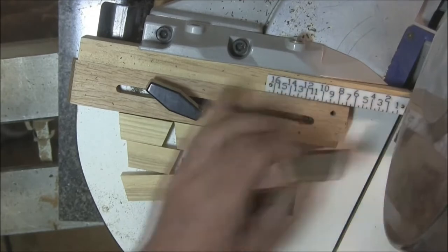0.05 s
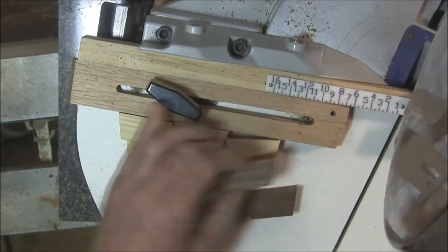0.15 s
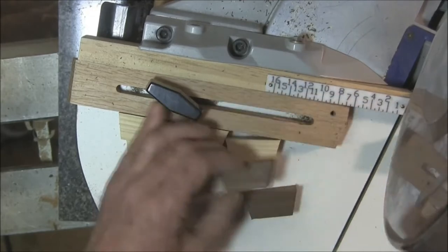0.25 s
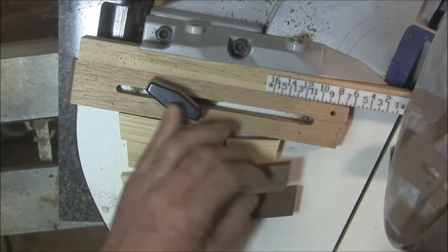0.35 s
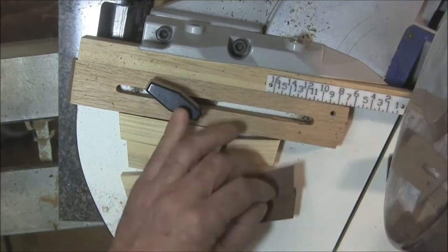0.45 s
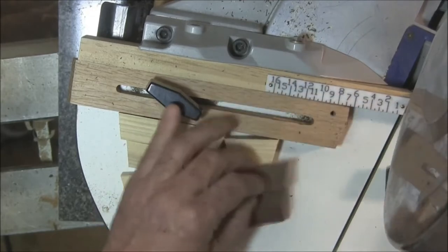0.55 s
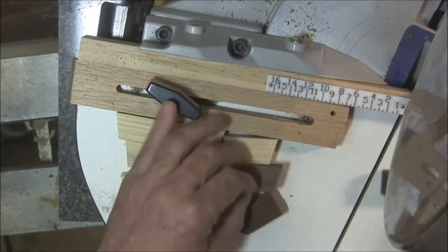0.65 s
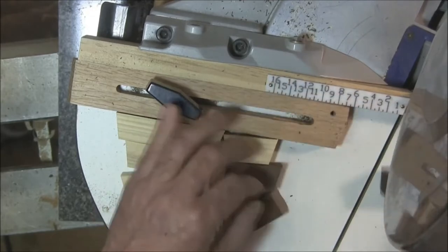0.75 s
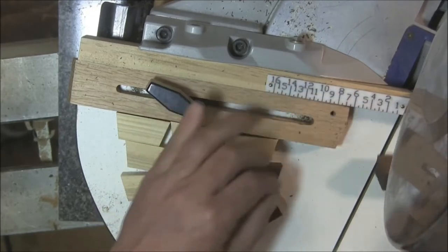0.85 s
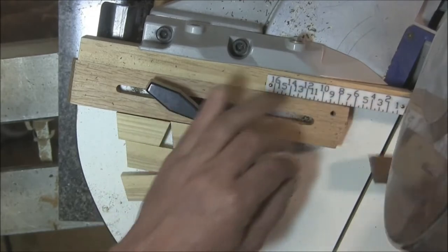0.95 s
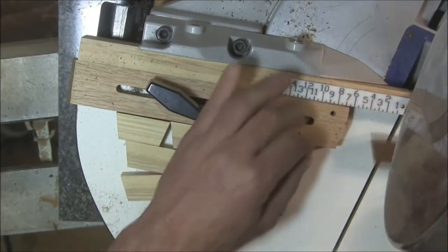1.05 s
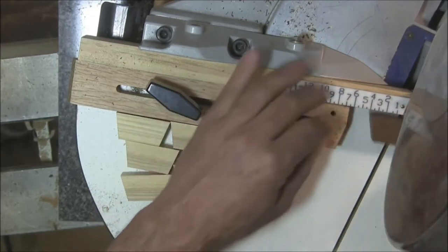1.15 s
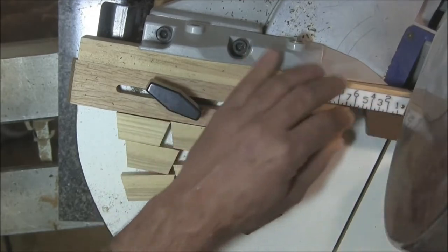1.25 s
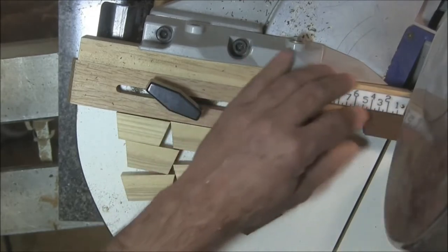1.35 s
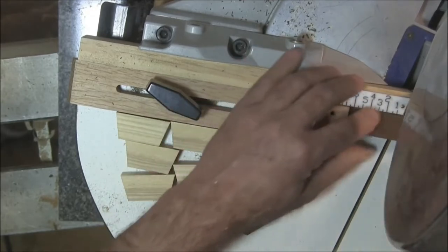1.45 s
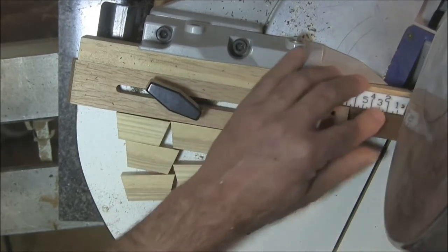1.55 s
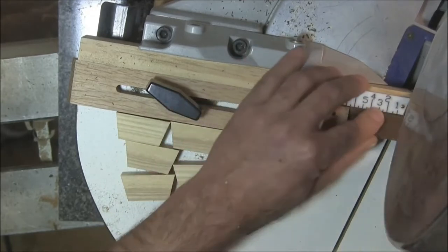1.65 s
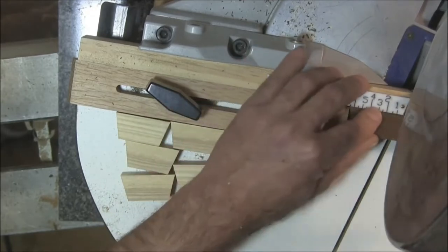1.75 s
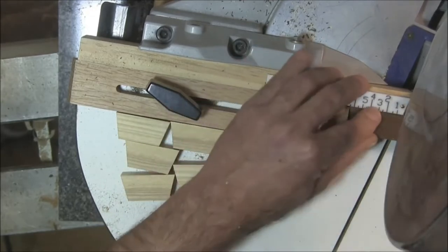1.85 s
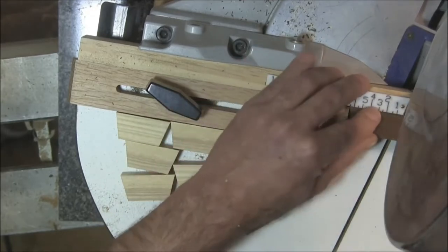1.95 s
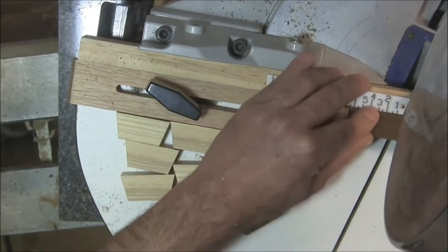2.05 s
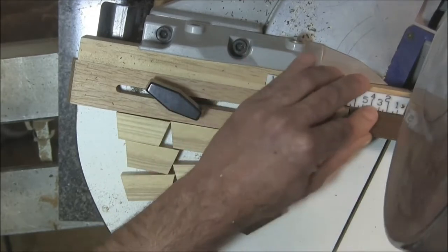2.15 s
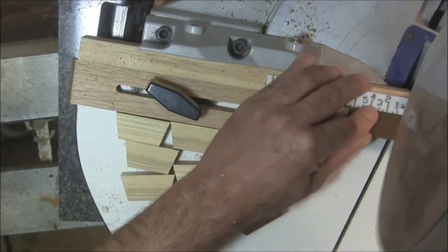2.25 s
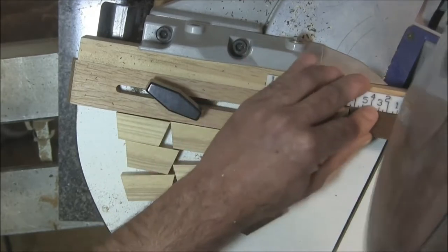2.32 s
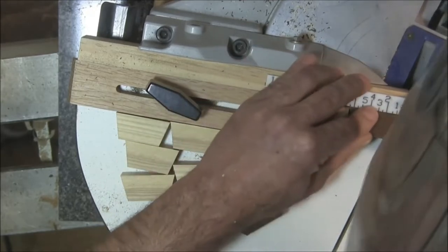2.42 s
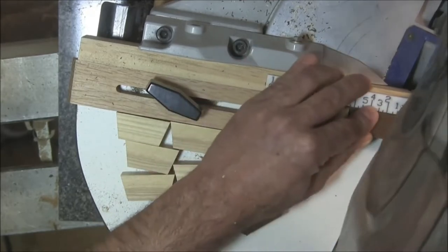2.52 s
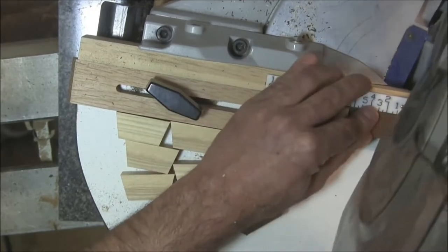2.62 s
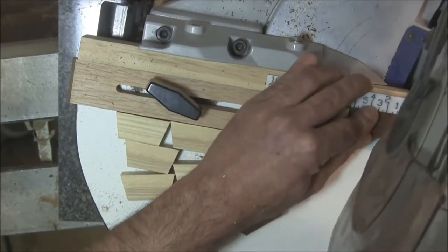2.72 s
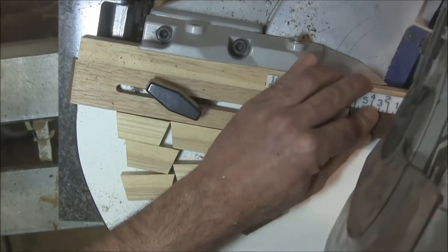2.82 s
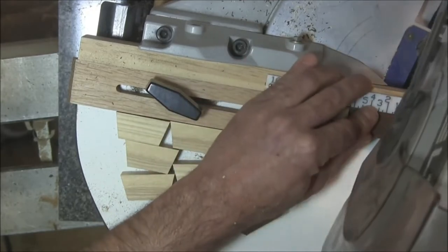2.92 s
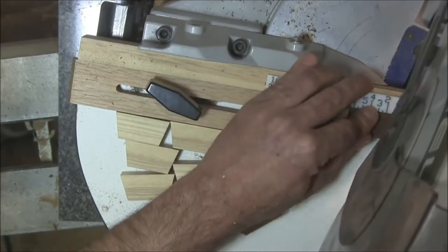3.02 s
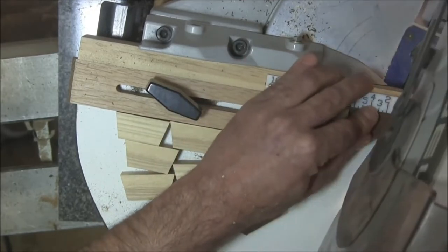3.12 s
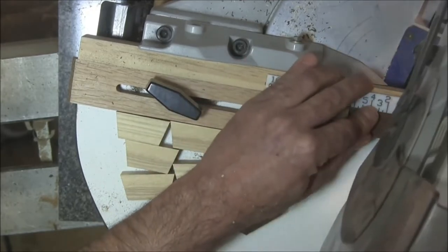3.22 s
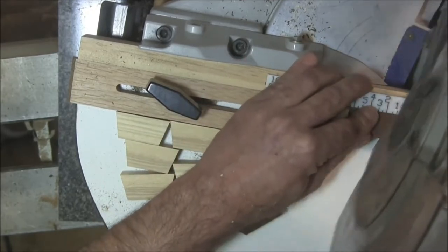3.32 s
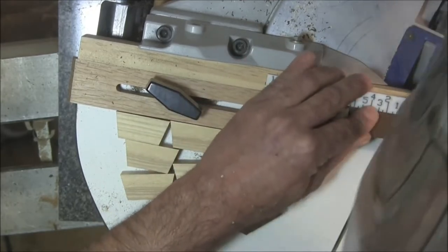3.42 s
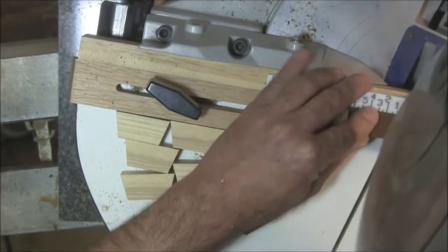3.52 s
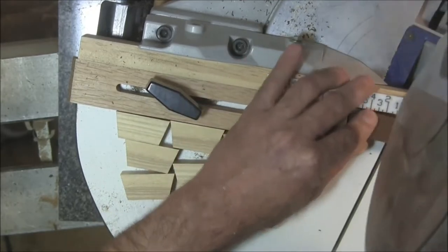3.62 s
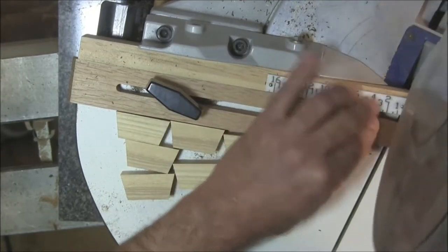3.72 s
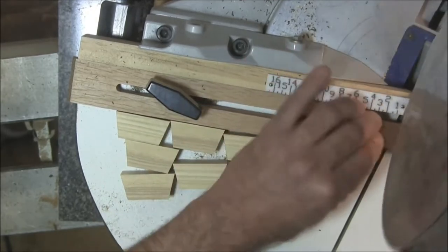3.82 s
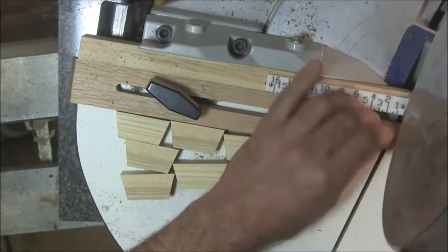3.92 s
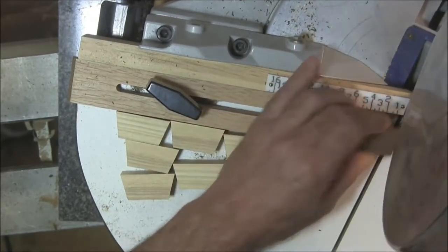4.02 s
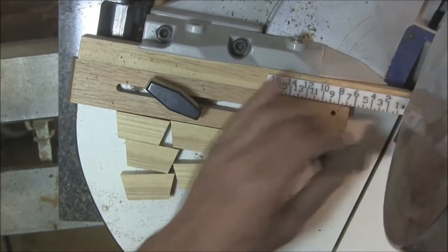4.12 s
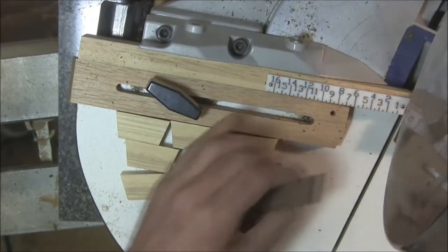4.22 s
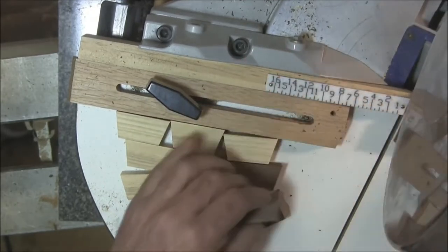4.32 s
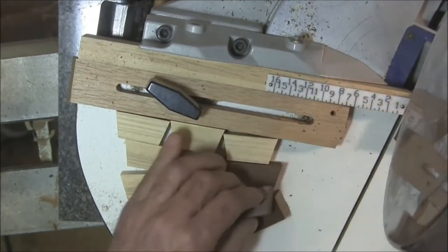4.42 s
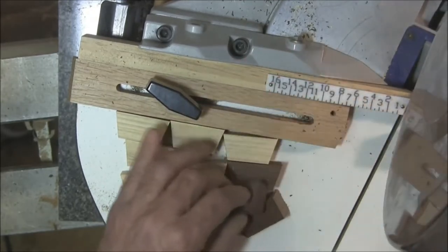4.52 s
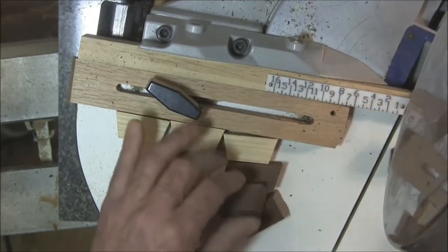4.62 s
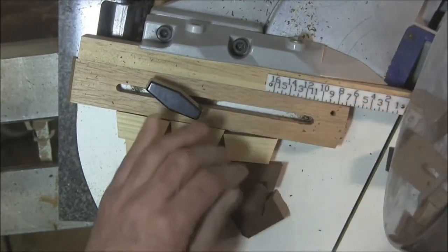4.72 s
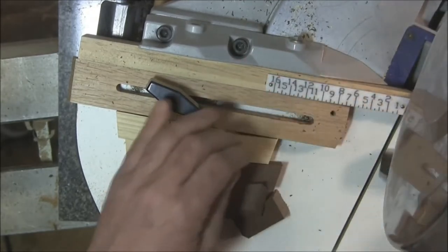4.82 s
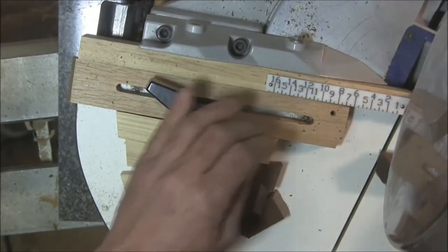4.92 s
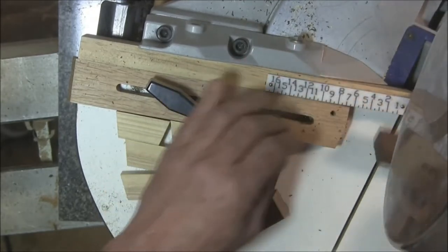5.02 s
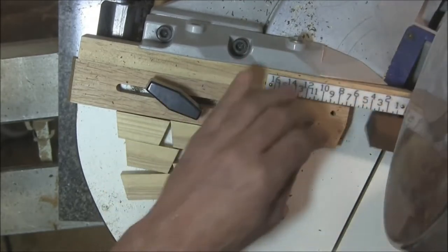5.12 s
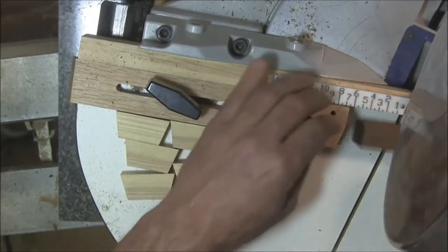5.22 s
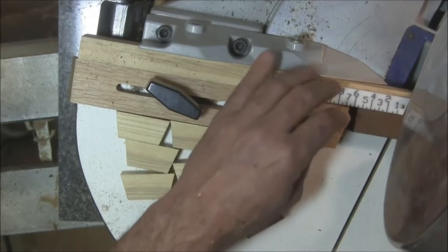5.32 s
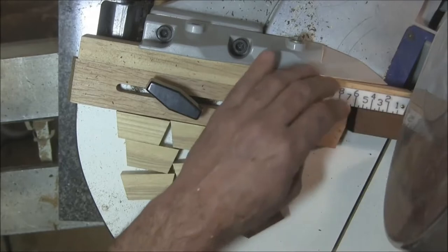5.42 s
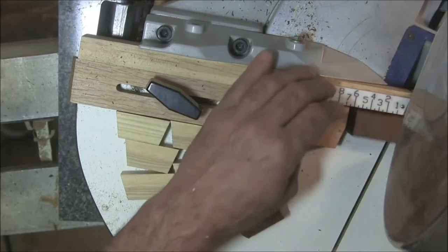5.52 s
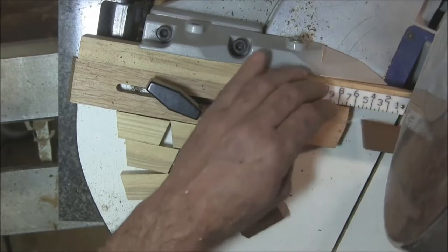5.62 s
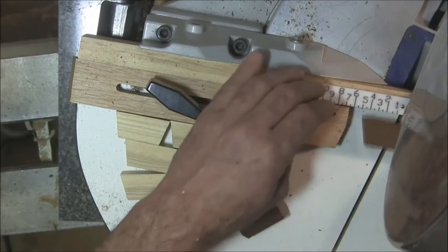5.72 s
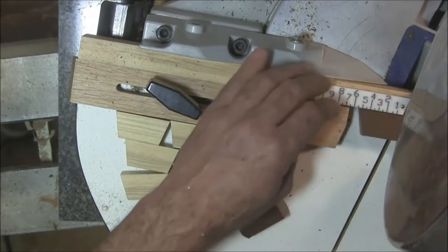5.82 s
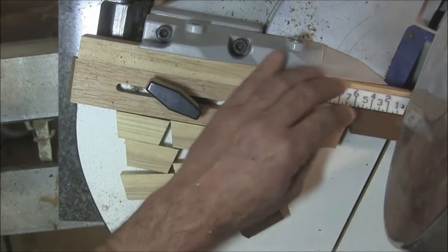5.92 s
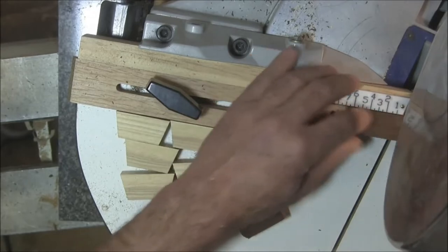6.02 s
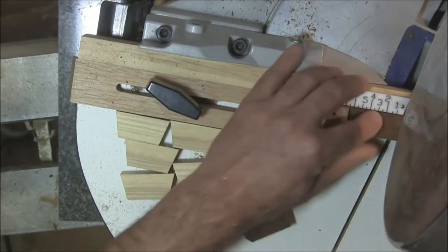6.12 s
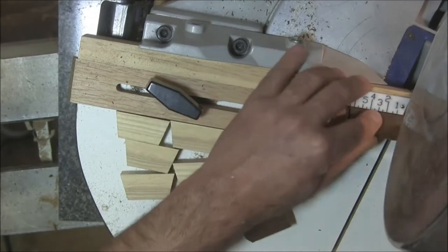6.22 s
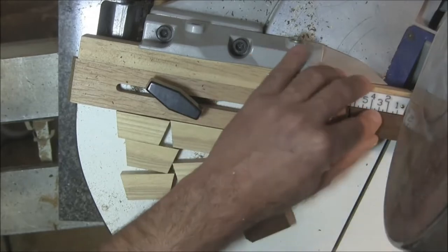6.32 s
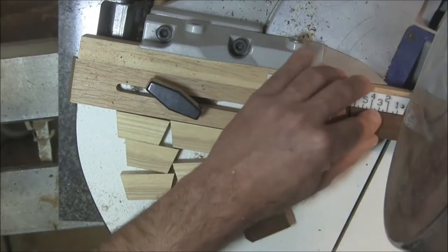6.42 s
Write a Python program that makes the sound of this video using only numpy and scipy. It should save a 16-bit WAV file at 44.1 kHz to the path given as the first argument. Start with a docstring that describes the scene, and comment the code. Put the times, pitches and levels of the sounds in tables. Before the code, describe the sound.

Close up, a chop saw whines up, rips through a wood strip and spins down, with small wood pieces tapping before and after.

```python
"""A chop saw in a small workshop

Close up, the saw coasts to a stop, is switched on, cuts a strip of wood and coasts down again.
The spinning core of its motor, the rotor, sets the pitch of the gear whine and the brush whine and
squeaks on every turn. The teeth tear the wood and make the blade ring. Meanwhile small wooden pieces
are put down and set against the fence (the guide rail), over a faint electrical buzz."""
import sys
import numpy as np
from scipy import signal
from scipy.fft import rfft, irfft, next_fast_len
from scipy.io import wavfile
from scipy.ndimage import uniform_filter1d

SR = 44100
rng = np.random.default_rng(int(sys.argv[2]) if len(sys.argv) > 2 else 0)


def master(y):
    """Save y as 16-bit WAV."""
    cut = np.clip(np.atleast_2d(y).T, -1, 1)
    pcm = np.round(cut * 32767)  # scale
    wavfile.write(sys.argv[1], SR, pcm.astype(np.int16))


N = 284870
TIME = np.arange(N) / SR

# rotor speed while the trigger is held: t/s, speed/(turns per s)
RUN_UP = [(2.48, 0), (2.53, 42), (2.6, 92), (2.7, 143), (2.8, 179), (2.87, 192), (3.15, 226), (3.45, 263),
          (3.57, 268)]
# the trigger is let go: t/s, time that friction and air drag alone need to end the spin/s
COASTS = [(-0.722, 2.787), (3.57, 2.8)]
# tones of the gears, whose small wheel has 9 teeth: cycles per turn, relative level/dB
GEAR_TONES = [(6, -3), (8, 0), (9, 10), (15, 2), (18, 12), (21, 6), (24, 2), (27, 5), (36, 5), (45, 4),
              (54, 2), (63, 7), (72, 2), (81, 6), (90, 3), (99, 3)]
# ringing of the gear case as those tones sweep through it: f/Hz, width/Hz, boost/dB
GEAR_CASE_MODES = [(742, 220, 9.5), (1110, 130, 1), (4500, 810, 3), (6960, 590, 3.5)]
# tones of the brushes sliding over the rotor's 28 contact bars: cycles per turn, relative level/dB
BRUSH_TONES = [(14, 21), (28, 16), (42, 4), (56, 17), (84, 19), (112, 17), (140, 16), (168, 15), (196, 12),
               (224, 10)]
# tone colour of the ringing motor shell, through which the brushes sound: f/Hz, level/dB
MOTOR_SHELL = [(400, -23.5), (1200, -13), (1700, -3), (2050, 2), (2600, -6), (3200, 3.5), (3900, -2.5),
               (5000, -9), (7000, -18.5), (11000, -8.5)]
# ringing of the blade guard and the table: f/Hz, width/Hz, boost/dB
BODY_MODES = [(462.3, 13, 13), (530, 130, 4.5), (785, 37, 1), (884, 23, 4), (1615, 60, 3), (2160, 99, -0.5),
              (3190, 98, 3), (4930, 110, 4), (6030, 120, 5.5), (6620, 230, 5), (8570, 230, 2.5),
              (10640, 230, 3)]
# tone colour of the saw's body when it coasts slowly: f/Hz, level/dB
BODY_COASTING = [(180, -58.5), (300, 3.5), (407, -12.5), (527, 2.5), (619, -7.5), (762, 1), (895, -7),
                 (1030, -3), (1450, -10.5), (3140, -3.5), (4060, -7), (4840, -0.5), (5250, -5),
                 (8900, -15.5), (9600, -21), (13300, -23), (14000, -42)]
# tone colour of the saw's body under power or at high speed: f/Hz, level/dB
BODY_POWERED = [(180, -33), (300, -9), (467, -4.5), (616, -2), (726, 1.5), (1880, -5.5), (2000, -2),
                (2870, -1), (4770, -2.5), (7300, -7.5), (8320, -19), (11400, -15), (15000, -40)]
# growl, whine, hiss and air of the running saw: low f/Hz, high f/Hz
RUNNING_BANDS = [(330, 1200), (1200, 3800), (3800, 7500), (7500, 15000)]
# loudness of those four bands: level at mid speed/dB, rise/(dB per doubling of speed),
# flattening/(dB per doubling squared), boost at full starting strain/dB
RUNNING_LEVELS = [(-44.5, 5, 0.11, 21.5), (-43, 5, 0.39, 9), (-41.5, 5.5, 1.16, 7.5), (-49, 6, 1, 0)]
# the blade goes through the strip, then grazes the loose end:
# t/s, length/s, entry level/dB, exit level/dB, fade/(dB per s)
CUTS = [(2.86, 0.28, -26.5, -21, 174), (3.232, 0.038, -38.5, -30.5, 72.5)]
# tone colour of tearing wood: f/Hz, level/dB
TEARING_WOOD = [(240, -45.5), (400, -16.5), (723, -13.5), (880, -5), (1430, -9.5), (1570, -11),
                (1820, -9.5), (3100, -15), (3890, -3), (4530, -8.5), (6510, 3), (10100, -7), (15000, -23)]
# ringing of the steel blade: f/Hz, width/Hz, boost/dB
BLADE_MODES = [(1610, 38, 12), (4300, 91, -2), (4250, 19, 7.5), (5000, 26, 9), (5430, 36, 5.5),
               (6100, 22, 5), (6230, 130, 1), (6520, 180, 3), (7470, 34, 11), (8740, 27, 9.5),
               (9930, 15, 14.5), (10100, 26, 6.5), (10620, 38, 10)]
# chips and puffs of air striking the microphone: t/s, peak level/dB
CHIPS = [(2.919, -24), (2.967, -24), (3.016, -24.5), (3.054, -22.5), (3.072, -24.5), (3.273, -23.5)]
# tone colour of the air stirred by the blade: f/Hz, level/dB
DRAUGHT_COLOUR = [(12, -27.5), (20, 3.5), (49, -0.5), (81, -2.5), (125, -5), (208, -9.5), (400, -6.5),
                  (520, -34), (880, -120)]
# knocks of wooden pieces on table and fence, and of the trigger:
# t/s, level/dB, time to fade by 60 dB/s, ring f/Hz, dull above f/Hz, thump level/dB
KNOCKS = [(0.151, -32, 0.072, 216, 420, -52), (0.718, -25, 0.047, 1100, 2660, -44),
          (1.0305, -21, .008, 3500, 4200, -37), (5.675, -19, .018, 5100, 6000, -36),
          (2.13, -39, 0.014, 5730, 8750, -49), (2.132, -43, 0.11, 820, 1090, -77),
          (2.482, -35, 0.055, 2460, 8100, -56), (4.711, -23, 0.038, 1020, 3600, -41),
          (5.279, -33, 0.037, 980, 2520, -56), (5.305, -29.5, 0.059, 1250, 2400, -46),
          (5.883, -42.5, 0.1, 794, 1810, -65), (5.961, -37, 0.056, 940, 1500, -52)]
# ringing of the wooden pieces and the table: f/Hz, width/Hz, boost/dB
WOOD_MODES = [(163, 360, 4.5), (910, 330, 7), (1780, 99, 5)]
# a piece is slid along the fence: t/s, length/s, level/dB
SLIDES = [(2.119, 0.133, -72), (5.661, 0.13, -57.5)]
# tone colour of wood rubbing on metal: f/Hz, level/dB
RUB_COLOUR = [(300, -12), (900, 0), (4300, -16), (6000, -2), (7500, -36), (12000, -34)]
# tone colour of the quiet workshop: f/Hz, level/dB
ROOM_COLOUR = [(12, -23.5), (20, 8.5), (263, -12), (302, -3), (328, -21), (419, -14), (481, -10.5),
               (2060, -23.5), (10900, -39), (12900, -30.5), (14000, -28.5)]
# steady hum of the mains power: f/Hz, level/dB
HUM_TONES = [(59.5, -74), (120, -83), (301, -90), (662, -87)]

STALL_SPEED, MID_SPEED, SKIP_SPEED, FREE_SPEED = 5.6, 100, 182, 270   # rotor turns per s
GEAR_RATIO, BLADE_TEETH = 6.4, 50   # the rotor turns 6.4 times for each turn of the blade
CUTOFF_HZ = 15100


def motor(speed, angle, cutting):
    """Gears and brushes shake the saw's body: louder with speed and strain, fuller under power."""
    shaking = resonate(gears_and_brushes(speed, angle, cutting), BODY_MODES)
    fullness = np.maximum(np.clip((speed - 60) / 120, 0, 1), powered())
    body = (1 - fullness) * coloured(shaking, BODY_COASTING) + fullness * coloured(shaking, BODY_POWERED)
    octaves, strain = doublings(speed), starting_strain(speed)
    out = np.zeros(N)
    for band, (db, rise_db, flattening_db, strain_db) in zip(RUNNING_BANDS, RUNNING_LEVELS):
        level_db = db + rise_db * octaves - flattening_db * octaves ** 2 + strain_db * strain
        out += from_db(level_db) * unit_power(butter(body, band, "band", order=5))
    return out * turning(speed)


def gears_and_brushes(speed, angle, cutting):
    """Gears and brushes whine and rub; rattling gears blur in pitch and throb once per blade turn."""
    speed_share = speed / FREE_SPEED
    rattle = 0.15 + 0.2 * speed_share + 0.42 * powered()
    # load takes up the slack in the drive, so the whine drops
    load_db = -17 * starting_strain(speed) - 10 * cutting - 3 * powered()
    gear_db = -2 + 3 * doublings(speed) + load_db
    gear_angle = angle + .003 * drift(25) + .017 * rattle * drift(420)
    throb = 1 + (.2 + .75 * speed_share ** 2) * np.cos(2 * np.pi * angle / GEAR_RATIO)
    gears = from_db(gear_db) * throb * whine(GEAR_TONES, speed, gear_angle, waver=.3)
    # at high speed the brushes skip and their whine fades
    skipping = np.clip((speed - SKIP_SPEED) / (FREE_SPEED - SKIP_SPEED), 0, 1)
    brush_db = -1.25 - 23 * skipping + load_db
    brush_angle = angle + .003 * rattle * drift(200)
    brushes = from_db(brush_db) * whine(BRUSH_TONES, speed, brush_angle, waver=.2)
    # the two brushes drag unequally
    friction = noise() * (1 + 0.19 * np.cos(4 * np.pi * angle) + 0.16 * np.cos(2 * np.pi * angle))
    wear = from_db(-3) * worn_contacts(speed, angle) * (1 - np.clip(rattle, 0, 1))
    return resonate(gears, GEAR_CASE_MODES) + shaped(brushes, MOTOR_SHELL) + wear + friction


def whine(tones, speed, angle, waver):
    """Tones that rise and fall with the rotor's speed, each wavering in strength."""
    out = np.zeros(N)
    for per_turn, db in tones:
        audible = per_turn * speed < CUTOFF_HZ
        strength = from_db(db) * (1 + waver * drift(50))
        out += audible * strength * np.sin(2 * np.pi * (per_turn * angle + rng.random()))
    return out * np.sqrt(4 * speed / SR)


def worn_contacts(speed, angle, tones=80, points=2048):
    """The same bumps in the contact bars pass on every turn, making a row of weak, evenly spaced tones."""
    phases = np.exp(2j * np.pi * rng.random(tones))
    bumps = unit_power(irfft(np.r_[0, phases], points))
    return np.interp(angle % 1, np.arange(points) / points, bumps) * np.sqrt(2 * tones * speed / SR)


def rotor_speed():
    """Turns per second: the motor runs up, then a fading brake, air drag and friction stop it."""
    braked_speed, brake_s, fade_s, fade_power = 198.3, .3263, .9645, 4.19
    friction, drag_s = 21.12, 7.353   # friction is in turns per s lost each second
    speed = np.interp(TIME, *np.transpose(RUN_UP)) * (TIME < RUN_UP[-1][0])
    for off_s, length_s in COASTS:
        age = np.maximum(TIME - off_s, 0)
        freewheel = friction * drag_s * np.expm1(np.maximum(length_s - age, 0) / drag_s)
        braked = braked_speed * np.exp(-age / brake_s - (age / fade_s) ** fade_power)
        moving = np.clip(freewheel - STALL_SPEED, 0, 1)
        speed += (TIME >= off_s) * (freewheel + braked) * moving
    return np.abs(uniform_filter1d(speed, size=1500))   # the rotor's weight smooths every change


def powered():
    """One while the trigger is held, zero otherwise."""
    held = (TIME > RUN_UP[0][0]) & (TIME < RUN_UP[-1][0])
    return uniform_filter1d(held.astype(float), size=1500)


def starting_strain(speed):
    """How hard the motor pulls: fully at switch-on, not at all once it spins freely."""
    return powered() * (1 - speed / FREE_SPEED) ** 2


def doublings(speed):
    """How many times the speed has doubled from mid speed; negative below it."""
    return np.log2(np.maximum(speed, STALL_SPEED) / MID_SPEED)


def turning(speed):
    """One while the rotor moves, zero at rest."""
    return np.clip(speed / STALL_SPEED, 0, 1)


def cut(angle, strength):
    """Each tooth tears out a chip and rings the blade; the grain makes the bite uneven."""
    tooth_hits = np.exp(-3 * (angle / GEAR_RATIO * BLADE_TEETH % 1))
    tearing = noise() * (0.24 + tooth_hits) * from_db(0.84 * drift(280))
    return strength * unit_power(resonate(coloured(tearing, TEARING_WOOD), BLADE_MODES))


def bite(attack_s=0.016):
    """How hard the teeth bite: a quick entry, a swell as the blade sinks in, then a fade."""
    out = np.zeros(N)
    for start, length, entry_db, exit_db, fade_db_per_s in CUTS:
        db = np.interp(TIME, [start, start + length], [entry_db, exit_db])
        db -= fade_db_per_s * np.maximum(TIME - start - length, 0)
        out += from_db(db) * np.clip((TIME - start) / attack_s, 0, 1)
    return out


def brush_squeak(speed, angle):
    """A brush chirps once a turn; the chirps are heard one by one as the rotor slows."""
    catch = np.exp(12 * (np.cos(2 * np.pi * angle) - 1))
    high = unit_power(butter(noise(), [11800, 12900], "band", order=3))
    low = unit_power(butter(noise(), [7600, 9000], "band"))
    return from_db(-67) * (high + from_db(-26) * low) * catch * np.clip(speed / 18, 0, 1)


def chips():
    """Dull pops as sawdust is thrown at the microphone."""
    hits = np.zeros(N)
    for start, db in CHIPS:
        hits[round(start * SR)] = from_db(db)
    dulled = butter(hits + 1e-18, 300, "low", order=3)
    pops = butter(dulled, 35, "high", order=1)
    return pops / pops.max() * hits.max()


def draught(speed, cutting):
    """The blade stirs up low gusts of air, stronger with speed, under power and while it cuts."""
    db = -54 + 4 * doublings(speed) + 2 * powered() + 5.5 * cutting
    return from_db(db + 1.87 * drift(11)) * turning(speed) * coloured(noise(), DRAUGHT_COLOUR)


def knocks():
    """Each knock is a short woody crack with a tail in the room, over a slow sway of the table."""
    out = np.zeros(N)
    age = np.arange(SR // 4) / SR
    for start, db, fade_s, ring_hz, dull_hz, thump_db in KNOCKS:
        room_tail = np.sqrt(fade_s) * from_db(-19 - 60 * age / .35)
        fading = from_db(-60 * age / fade_s) + room_tail
        attack = 1 - np.exp(-age / 0.000067)
        burst = rng.standard_normal(len(age)) * fading * attack
        modes = [(ring_hz, ring_hz / 4, 7), *WOOD_MODES]
        crack = resonate(butter(burst, dull_hz, "low", order=4), modes)
        crack *= from_db(db - 12.5) / np.sqrt(np.mean(crack[:SR // 200] ** 2))   # level of the first 5 ms
        sway = -np.sin(2 * np.pi * 29 * age) * from_db(thump_db - 60 * age / 0.1)
        first = round(start * SR)
        out[first:first + len(age)] += (crack + sway)[:N - first]
    return out


def slides(ramp_s=0.0052):
    """A short grainy rub as a piece of wood is pushed along the fence."""
    level = np.zeros(N)
    for start, length, db in SLIDES:
        inside_s = np.minimum(TIME - start, start + length - TIME)
        level += from_db(db) * np.clip(inside_s / ramp_s, 0, 1)
    return level * coloured(noise() * from_db(3.3 * drift(140)), RUB_COLOUR)


def room(x, echo_db=-10, fade_s=0.15):
    """Many short echoes from bench and walls make gliding tones swell and fade."""
    age = np.arange(SR // 3) / SR
    echoes = rng.standard_normal(len(age)) * from_db(-60 * age / fade_s) * (age > .002)
    reflected = signal.fftconvolve(x, echoes / np.linalg.norm(echoes))[:N]
    gain = from_db(echo_db)
    return (x + gain * reflected) / np.hypot(1, gain)


def workshop(pulse_hz=30):
    """Dull room noise, mains hum and a faint, pulsing electrical buzz."""
    hum = sum(from_db(db) * np.sqrt(2) * np.sin(2 * np.pi * (hz * TIME + rng.random()))
              for hz, db in HUM_TONES)
    pulse = 2 * np.pi * pulse_hz * TIME
    sparks = np.exp(3 * (np.cos(8 * pulse) - 1)) * (1 + .6 * np.cos(pulse))
    buzz = unit_power(butter(noise() * sparks, [800, 4000], "band"))
    air = butter(coloured(noise(), ROOM_COLOUR), 13000, "low", order=8)
    return from_db(-71.5) * air + hum + from_db(-84.5) * buzz


def from_db(db):
    """Turn decibels into a factor to multiply by."""
    return 10 ** (np.asarray(db) / 20)


def unit_power(x):
    """Scale a sound to an average power of one."""
    return x / np.sqrt(np.mean(x ** 2) + 1e-20)


def noise():
    """White noise: an even hiss."""
    return rng.standard_normal(N)


def drift(rate_hz):
    """A random wobble of about plus or minus one, with rate_hz new values a second."""
    values = rng.standard_normal(4096)
    return unit_power(np.interp(TIME * rate_hz, np.arange(len(values)), values))


def butter(x, hz, kind, order=2):
    """Keep the lows, the highs or a band; a higher order cuts more steeply."""
    return signal.sosfilt(signal.butter(order, hz, kind, fs=SR, output="sos"), x)


def resonate(x, modes):
    """Each mode is a pitch at which an object rings; it changes the level of a band around it."""
    for hz, width, db in modes:
        b, a = signal.iirpeak(hz, hz / width, fs=SR)
        x = x + (from_db(db) - 1) * signal.lfilter(b, a, x)
    return x


def shaped(x, colour):
    """Turn each frequency up or down along a tone colour curve."""
    hz, db = np.transpose(colour)
    size = next_fast_len(N)
    bin_hz = np.maximum(np.arange(size // 2 + 1) * SR / size, 1)
    gain = from_db(np.interp(np.log(bin_hz), np.log(hz), db))
    return irfft(rfft(x, size) * gain, size)[:N]


def coloured(x, colour):
    """Give a sound a tone colour and a power of one."""
    return unit_power(shaped(x, colour))


def scene():
    """Saw, wooden pieces and workshop; everything is close and reaches both channels alike."""
    speed, strength = rotor_speed(), bite()
    angle = np.cumsum(speed) / SR   # in rotor turns
    cutting = np.sqrt(strength / strength.max())   # load on the blade, 0 to 1
    saw = room(motor(speed, angle, cutting) + cut(angle, strength))
    saw = saw + brush_squeak(speed, angle) + draught(speed, cutting) + chips()
    return np.tile(saw + knocks() + slides() + workshop(), (2, 1))


def record(dry, ceiling=.32):
    """The microphone rounds off the loudest peaks, and the highest treble is cut steeply."""
    rounded = dry / (1 + (dry / ceiling) ** 4) ** .25
    return signal.sosfilt(signal.ellip(10, .1, 80, CUTOFF_HZ, fs=SR, output="sos"), rounded)


dry = scene()
out = record(dry)
master(out)
```